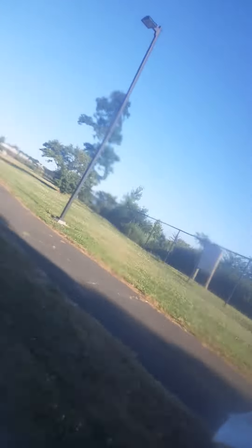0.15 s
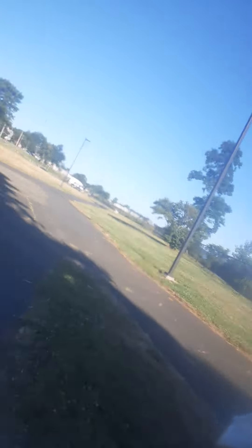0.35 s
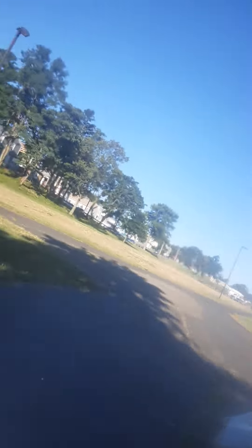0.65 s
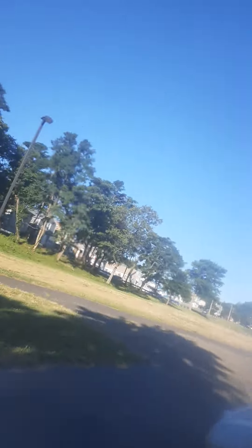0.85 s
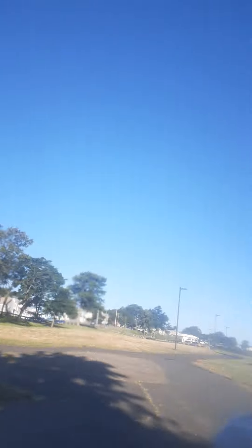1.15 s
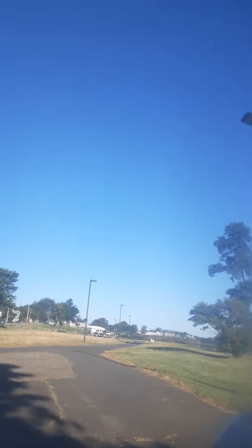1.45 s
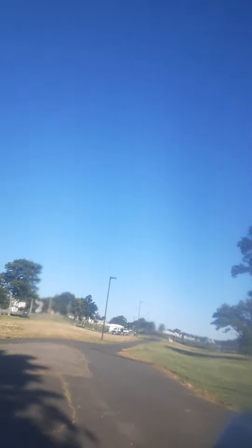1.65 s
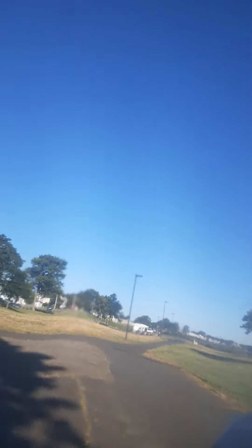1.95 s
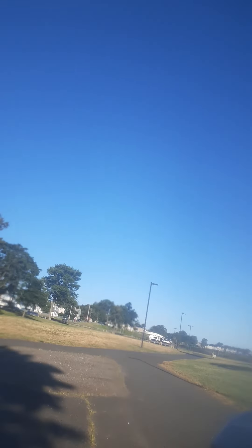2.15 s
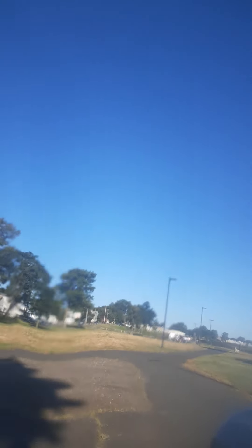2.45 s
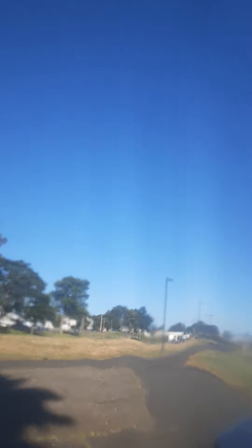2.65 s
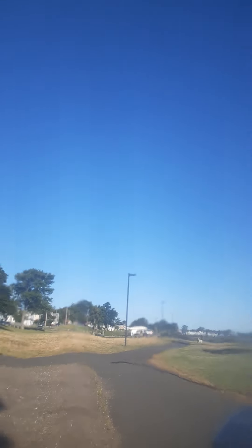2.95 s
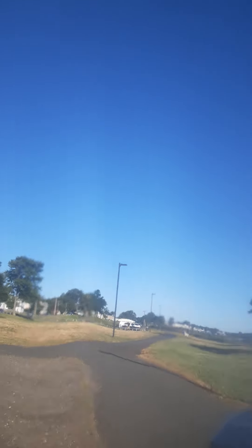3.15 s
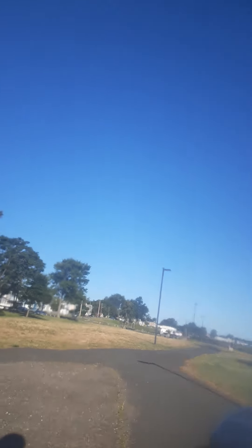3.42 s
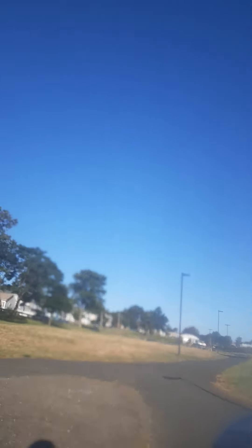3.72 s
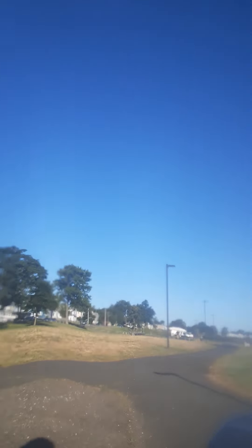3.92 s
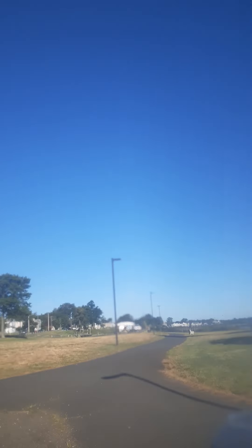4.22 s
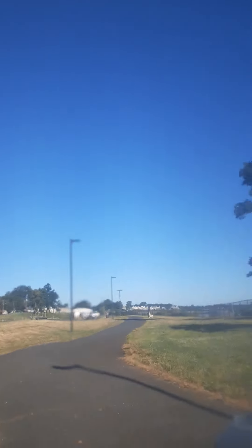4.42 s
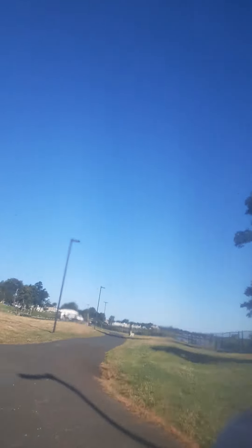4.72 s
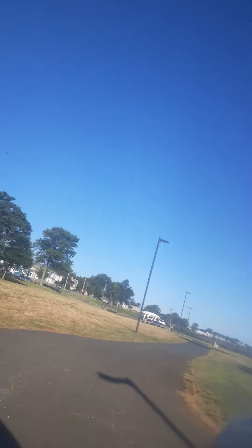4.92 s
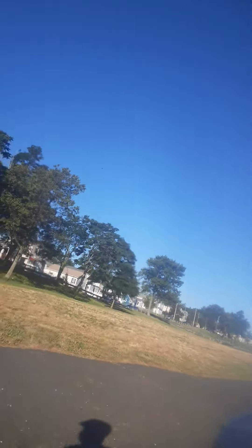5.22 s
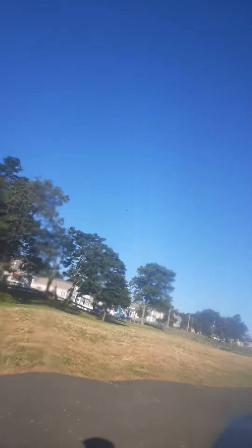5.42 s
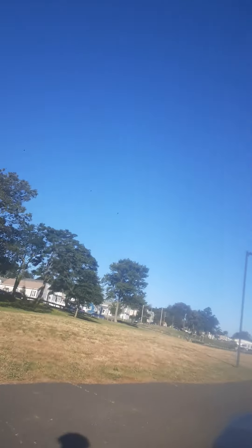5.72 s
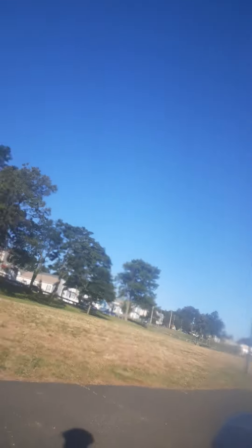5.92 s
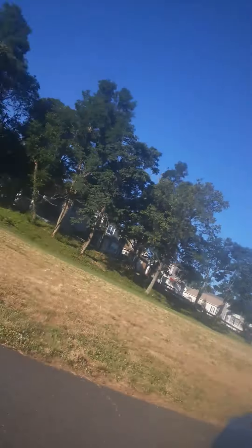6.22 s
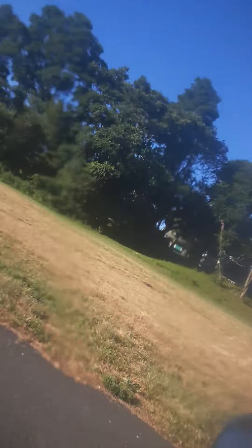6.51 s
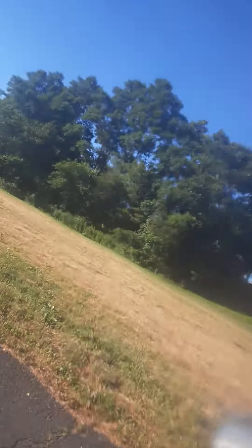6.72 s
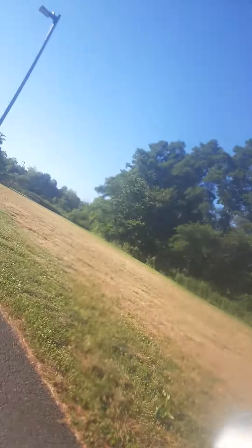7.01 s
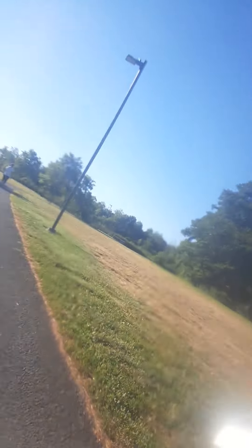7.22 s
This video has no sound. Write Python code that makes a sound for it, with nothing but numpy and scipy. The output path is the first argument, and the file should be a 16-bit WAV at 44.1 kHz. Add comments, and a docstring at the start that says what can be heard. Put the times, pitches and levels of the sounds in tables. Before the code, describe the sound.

A bike-mounted microphone catches close, dry outdoor rolling. Rough thumps and gritty snaps open, then a few woody clacks lead into a quiet smooth stretch where an electric motor hum climbs. A dense run of bumps follows, easing into soft wheel hiss, thin brake squeaks and a short falling whine. A loose fitting clacks, a burst of grit crackles over low tread hum, and the motor returns.

```python
"""Electric bike on a park path

An electric bike rolls along a paved path, heard from a microphone riding on it.
Filtered noise gives the tyre rumble, air and wheel hiss; random clicks crackle as grit and shake the mount.
Bumps and a loose fitting ring hollow, as clicks sent through decaying resonances.
On a smooth stretch wavering sines make the hub motor whine upward, then slow down and pick up again later.
Before the bend short, very high tones squeak as the brake; the tread hums as the bike leans over.
"""
import sys
import numpy as np
from scipy import signal
from scipy.fft import rfft, irfft
from scipy.io import wavfile
from scipy.ndimage import uniform_filter1d, minimum_filter1d

SR = 44100
rng = np.random.default_rng(int(sys.argv[2]) if len(sys.argv) > 2 else 0)


def store_wav(level_fs):
    """Save 16-bit WAV to argv[1]."""
    pcm = np.round(np.clip(np.atleast_2d(level_fs), -1, 1) * 32767)
    wavfile.write(sys.argv[1], SR, pcm.T.astype(np.int16))


N = 324576
TIME = np.arange(N) / SR


def from_db(db):
    """Turn decibels into a gain."""
    return 10 ** (np.asarray(db) / 20)


def rms_one(x):
    """Scale so that the average of the channels has rms 1."""
    middle = np.atleast_2d(x).mean(axis=0)
    return x / np.sqrt(np.mean(middle ** 2) + 1e-20)


def in_time(rows):
    """Draw straight lines between the rows: each column after the time, at every sample."""
    times, *columns = np.transpose(rows)
    return [np.interp(TIME, times, column) for column in columns]


def drift(rate_hz):
    """Smooth random wandering with spread 1; a higher rate (up to 180 Hz) wanders faster."""
    knots_per_s = 400
    knots = rng.standard_normal(int(N / SR * knots_per_s) + 2)
    lowpass = signal.butter(2, min(rate_hz, 180), fs=knots_per_s, output="sos")
    slow = signal.sosfiltfilt(lowpass, knots, padtype="even")
    return rms_one(np.interp(TIME, np.linspace(0, N / SR, len(slow)), slow))


def coloured(x, spectrum):
    """Filter to the given spectrum without sounding early (minimum phase); white noise keeps its energy."""
    size = 4096
    hz, db = np.transpose(spectrum)
    grid_hz = np.maximum(np.arange(size // 2 + 1) * SR / size, 1)
    gain = from_db(np.interp(np.log(grid_hz), np.log(hz), db))
    # folding the cepstrum forward puts the filter's energy as early as possible
    cepstrum = irfft(np.log(gain))
    cepstrum[1:size // 2] *= 2
    cepstrum[size // 2 + 1:] = 0
    response = irfft(np.exp(rfft(cepstrum)))
    response = response / np.linalg.norm(response)
    return signal.fftconvolve(np.atleast_2d(x), [response], axes=1)[:, :N]


def pan(left_db):
    """Gains of the two channels, with mean 1; the left one is left_db above the right."""
    gains = np.array([[from_db(left_db)], [1]])
    return gains / gains.mean()


def stereo(pair, alike, left_db):
    """Mix two unrelated signals into two channels with the given correlation and balance."""
    alike = np.clip(alike, -.95, .95)
    shared = np.sqrt(1 + alike) * pair[0]
    opposed = np.sqrt(1 - alike) * pair[1] * [[1], [-1]]
    return (shared + opposed) * pan(left_db)


def clicks(times, heights):
    """Single impulses at the given times."""
    return np.bincount((np.asarray(times) * SR).astype(int), heights, N)[:N]


def grains(per_s, spread_db):
    """Random impulses of either sign, mostly small, a few large."""
    sizes = from_db(spread_db * np.minimum(rng.exponential(1, N), 4))
    return (rng.random(N) < per_s / SR) * sizes * rng.choice([-1, 1], N)


def fading(x, decay_s):
    """Each impulse becomes a burst that dies away exponentially."""
    return signal.lfilter([1], [1, -np.exp(-1 / (decay_s * SR))], x)


def ring(x, hz, t60):
    """A unit impulse starts a sine of height 1 that falls by 60 dB in t60 seconds."""
    radius = from_db(-60 / (t60 * SR))
    turn = 2 * np.pi * hz / SR   # angle per sample
    return signal.lfilter([0, np.sin(turn)], [1, -2 * radius * np.cos(turn), radius * radius], x + 1e-18)


def struck(times, level_db, modes, vary_db):
    """Each blow rings every mode a little differently; the two sides of the body rock against each other."""
    out = 0
    for hz, db, t60, left_db in modes:
        heights = from_db(level_db + db + vary_db * rng.standard_normal(len(times)))
        signs = rng.choice([-1, -1, 1], len(times))   # the left side mostly moves the opposite way
        left = clicks(times, heights * signs) * from_db(left_db)
        right = clicks(times, heights)
        out = out + ring(np.array([left, right]), hz, t60)
    return out


def softened(x, edge_hz):
    """A padded contact passes little treble."""
    return signal.sosfilt(signal.butter(2, edge_hz, fs=SR, output="sos"), x)


def rolling(rumble_db, shake_db):
    """The tyres rumble, and a quick run of small jolts keeps the mount ringing."""
    # colour of the tyre rumble: (frequency [Hz], relative level [dB])
    rumble_colour = [(20, -52), (42, -34.5), (64, -14.5), (86, 1), (116, 2.5), (155, -11.5), (230, -20),
                     (800, -85)]
    # colour of the shaking mount: (frequency [Hz], relative level [dB])
    shake_colour = [(60, -45.5), (170, -4), (230, -3), (315, 6.5), (370, -0.5), (430, -10.5), (520, -25.5),
                    (800, -32.5), (2500, -77)]
    noise = stereo(rng.standard_normal((2, N)), alike=-.55, left_db=-3.5)
    rumble = rms_one(coloured(noise, rumble_colour))
    jolts = rms_one(np.array([grains(per_s=330, spread_db=3.5) for side in range(2)]))
    shake = rms_one(coloured(stereo(jolts, alike=0.14, left_db=-11.0), shake_colour))
    return from_db(rumble_db) * rumble + from_db(shake_db) * shake


def tyre_load():
    """Swing of the load on the tyres in dB: it drops before each bump and rises or dips on landing."""
    # uneven spots where the bike goes light, then lands:
    # (time of landing [s], half-length [s], landing lift [dB], drop before it [dB])
    bumps = [(0.45, 0.024, -0.5, 3), (0.748, 0.055, -5, 13.5), (1.045, 0.084, 4.5, 9.5),
             (2.581, 0.061, 5, 0.5), (3.808, 0.08, 5, 3), (4.022, 0.073, 5.5, -1.5)]
    light_lead = 1.7   # half-lengths by which the light moment precedes the landing
    load_db = 0
    for s, half_s, lift_db, drop_db in bumps:
        along = (TIME - s) / half_s
        landing = lift_db * np.exp(-along ** 2)
        light = drop_db * np.exp(-(along + light_lead) ** 2)
        load_db = load_db + landing - light
    return load_db


def grit(grit_db):
    """Grains snap under the tread in loose clumps over finer sand; some snaps and the stones sound brighter."""
    # colour of the snapping grit: (frequency [Hz], relative level [dB])
    grit_colour = [(400, 5.5), (1100, 1), (1700, 5.5), (3600, -1), (5000, -6), (6800, -16.5), (9000, -31.5),
                   (12000, -41.5)]
    # colour of the bright grains: (frequency [Hz], relative level [dB])
    bright_colour = [(3000, -8), (7000, -0.5), (9000, -13), (11000, 10.5), (15500, -8.5)]
    clumps = np.clip(drift(45), -2, 1.5)
    thick_db = grit_db + 55   # against the usual depth of grit
    # more grains snap where the grit lies thick
    snaps = grains(225 * from_db(5.5 * clumps + .8 * thick_db), spread_db=3.7)
    # even out the loudness of busy and sparse moments
    snaps = snaps / np.sqrt(np.abs(uniform_filter1d(snaps ** 2, size=2500)) + 0.049)
    sand_db = 4.5 * clumps + .4 * thick_db - 19.5
    sand = rms_one(grains(per_s=2200, spread_db=2.5)) * from_db(sand_db)
    stones = flicked_stones()
    bed = from_db(grit_db + 9.5) * (snaps + sand) + stones
    # about one snap in eight, and the flicked stones, also reach the top treble
    bright_snaps = snaps * (rng.random(N) < .12)
    bright = from_db(grit_db + 3.5) * bright_snaps + from_db(-20.0) * stones
    # each snap scatters a little dust
    dust = 0.22 * fading(np.abs(bed), decay_s=.0007) * rng.standard_normal((2, N))
    return from_road(coloured(bed + dust, grit_colour) + coloured(bright, bright_colour))


def flicked_stones():
    """Each large stone flicked by a tyre snaps once and sets off a short, dying scatter of smaller grains."""
    # the largest stones: (time [s], strength of the snap before colouring [dB])
    stone_rows = [(0.012, -19.5), (.024, -16), (0.1068, -12), (0.508, -13.5), (0.751, -13.5),
                  (1.0048, -15.5), (2.551, -14), (2.858, -21), (2.879, -15), (3.0537, -16), (3.1309, -16),
                  (4.501, -17.5), (4.672, -22), (4.8, -19), (4.831, -20.5), (4.921, -20), (4.941, -22),
                  (5.122, -22.5), (5.2327, -15.5), (5.353, -19.5), (5.509, -22), (5.613, -21.5),
                  (5.6333, -23.5), (5.703, -24), (5.7466, -19.5), (5.792, -22), (5.949, -24), (6.084, -25),
                  (6.1986, -20), (6.268, -16.5), (6.359, -17), (6.382, -20), (6.414, -22), (6.447, -35),
                  (6.499, -17), (6.55, -19.5), (6.663, -23.5), (6.7265, -24), (6.7662, -17.5),
                  (6.8367, -16), (7.0267, -20), (7.11, -29), (7.139, -12.5), (7.2327, -19), (7.2745, -18)]
    times, strength_db = np.transpose(stone_rows)
    snaps = clicks(times, from_db(strength_db))
    dying = fading(snaps + 1e-18, decay_s=.004)
    return snaps + from_db(-11) * dying * grains(per_s=800, spread_db=4.0)


def from_road(x):
    """Grit sounds reach the right port of the microphone a moment later, and with a colour of its own."""
    # colour of the grit at the far, right port: (frequency [Hz], relative level [dB])
    far_port = [(5000, 3.5), (7000, 10), (10500, -14.5), (14500, 11.5)]
    lag = 13   # samples
    right = coloured(x[1], far_port)[0]
    return np.array([x[0], np.pad(right, (lag, 0))[:N]])


def knocks(grit_db, shake_db):
    """An edge rings the mount and crunches the tread; the harder the crunch, the stronger the frame thuds."""
    # hard edges that knock the mount: (time [s], strength of ring [dB], strength of crunch [dB])
    hard_edges = [(0.087, 6, -28), (0.262, 0, -34), (0.392, 5, -29.5), (0.427, 0, -25), (0.445, 9, -24.5),
                  (0.477, 3, -15), (0.55, 4, -29), (0.587, 11, -21), (0.715, 2.5, -22.5), (0.747, 1, -29),
                  (1.027, 2, -19), (1.078, 20, -37), (2.419, 7, -33), (2.506, -9, -23), (2.573, 0, -26),
                  (2.61, 7.5, -27.5), (2.679, 8, -15.5), (2.746, 9, -22.5), (2.853, 7, -23),
                  (2.934, -2.5, -33), (3.001, 0.5, -33.5), (3.077, 11.5, -23.5), (3.158, -4, -35.5),
                  (3.227, 4, -25.5), (3.287, -2.5, -32), (3.344, 7, -29), (3.411, 0.5, -31),
                  (3.479, 0, -29.5), (3.761, -3, -27.5), (3.791, 9, -13.5), (3.824, 13, -18.5),
                  (3.855, -1, -21), (3.882, 3, -38), (3.976, 12, -31), (3.995, 7.5, -19.5),
                  (4.4, -2, -34.5), (4.555, 0, -30), (4.607, 0, -28.5)]
    # modes of the mount: (frequency [Hz], level [dB], 60 dB decay time [s], left minus right [dB])
    mount = [(255, -7, .028, -9), (315, -2, .034, -11), (365, -5, .032, -12), (640, -20, .018, -6)]
    # modes of the frame on its tyres: (frequency [Hz], level [dB], 60 dB decay time [s], left minus right [dB])
    frame = [(85, -10.5, 0.03, 4), (140, 6, 0.035, -19), (159.5, 9.5, 0.089, -8)]
    # colour of the crunch: (frequency [Hz], relative level [dB])
    crunch_colour = [(150, -7), (560, 9.5), (900, -3.5), (1500, -11), (2300, -17.5), (6800, -30.5),
                     (9000, -42.5)]
    edges = np.vstack([hard_edges, small_edges(grit_db, shake_db, count=130)])
    times, ring_db, crunch_db = edges.T
    rings = softened(struck(times, ring_db, mount, vary_db=5.0), edge_hz=247)
    thuds = softened(struck(times, crunch_db + 10, frame, vary_db=2.0), edge_hz=122)
    body = signal.sosfilt(signal.butter(3, 75, "high", fs=SR, output="sos"), rings + thuds)
    burst = fading(clicks(times, from_db(crunch_db)), decay_s=0.009)
    contacts = rms_one(np.array([grains(per_s=1100, spread_db=0.6) for side in range(2)]))
    crunch = stereo(0.5 * burst * contacts, alike=0.012, left_db=-5.5)
    return body + coloured(crunch, crunch_colour)


def small_edges(grit_db, shake_db, count):
    """Faint knocks on small edges in the paving at random times, harder where it is both rough and gritty."""
    when, size = rng.random((count, 2)).T
    at = (when * (N - 1)).astype(int)
    # a crunch lies 15.5 dB above the grit where the mount shakes at -27.5 dB
    rough_db = shake_db[at] + 27.5
    vary_db = 1.5 * (2 * size - 1)
    crunch_db = grit_db[at] + 15.5 + rough_db + vary_db
    ring_db = crunch_db + 20.5
    return np.transpose([at / SR, ring_db, crunch_db])


def clunks():
    """A loose fitting clacks on its stop and rings a hollow note with a short woody overtone; hard clacks glint."""
    # blows of the fitting: (time [s], strength of note [dB], pitch [Hz], 60 dB decay time [s],
    # overtone relative to the note [dB], strength of clack [dB])
    blows = [(1.2457, -3, 310, 0.012, -6, -42.5), (1.311, -3, 320, 0.02, -5.5, -44),
             (1.376, -2.5, 335, 0.03, -7.5, -41), (5.9867, 2, 343, 0.04, -8.5, -34.5),
             (6.0998, -1.5, 357, 0.057, -5, -45), (6.1216, -3, 356.5, 0.089, -20, -42),
             (6.875, -8.5, 345, 0.098, -19, -62)]
    # modes of the clack: (middle frequency [Hz], middle level [dB], 60 dB decay time [s])
    clack_modes = [(1570, 2, 0.017), (1930, 2, 0.0095), (2500, -0.5, 0.012), (6800, -8, .012)]
    glint_db = -29.5     # metallic top of the hardest clack, before filtering
    glint_growth = 2.5   # dB lost per dB by which a clack is softer
    notes, clacks, glints = 0, 0, 0
    hardest_db = max(row[-1] for row in blows)
    hollow = signal.butter(2, [220, 540], "band", fs=SR, output="sos")
    for s, db, hz, t60, overtone_db, clack_db in blows:
        blow = clicks([s], [1.0])
        overtone = from_db(overtone_db) * ring(blow, hz=676, t60=0.026)
        note = signal.sosfilt(hollow, ring(blow, hz, t60)) + softened(overtone, edge_hz=370)
        notes = notes + from_db(db) * note
        for k, (mode_hz, mode_db, mode_t60) in enumerate(clack_modes):
            # each blow lands on a different spot
            detune, vary_db = rng.uniform(-1, 1, 2) * [.08, 2.5]
            height = (-1) ** k * from_db(clack_db + mode_db + vary_db)
            clacks = clacks + height * ring(blow, mode_hz * (1 + detune), mode_t60)
        contact = (TIME >= s) * np.exp(-np.abs(TIME - s) / 0.0019)
        glints = glints + from_db(glint_db + glint_growth * (clack_db - hardest_db)) * contact
    notes = notes * [[.2], [1.2]]   # mostly on the right
    treble = signal.butter(2, [5000, 15000], "band", fs=SR, output="sos")
    glints = signal.sosfilt(treble, glints * rng.standard_normal((2, N)))
    return notes + (clacks + glints) * pan(-3.5)


def motor():
    """Under power the gears sing, and wavering partials swell on resonances; at light load one line is left."""
    # motor speeding up: (time [s], gear pitch [Hz], level [dB])
    speeding_up = [(1.38, 306, -24), (1.47, 307.4, -20), (1.64, 314, -16.5), (1.8, 338.5, -14),
                   (1.94, 366.2, -20.5), (2.19, 421.2, -28), (2.29, 425.6, -45), (2.38, 435.3, -30),
                   (2.48, 460.6, -45)]
    # motor slowing down: (time [s], gear pitch [Hz], level [dB])
    slowing_down = [(5.12, 440, -44), (5.2, 387.2, -33.5), (5.28, 339, -22), (5.37, 289, -40),
                    (5.6, 172.6, -35), (5.68, 150.2, -37)]
    # motor picking up again out of the bend: (time [s], gear pitch [Hz], level [dB])
    picking_up = [(7.08, 286, -29), (7.42, 296.8, -23)]
    # weaker partials: (multiple of the gear pitch, level away from resonances [dB])
    orders = [(.442, -31), (.885, -39), (2, -58), (3, -71.5)]
    # resonances of frame, mount and motor housing: (frequency [Hz], half-width [Hz], lift [dB])
    resonances = [(130.5, 3, 9), (198, 7.2, 4), (349.6, 23, 16), (865, 72, 6.5)]
    out, phase, on = gear_tone(speeding_up, waver_db=0.55)
    pitch = in_time(speeding_up)[0]
    for multiple, db in orders:
        swell_db = 0
        for hz, width_hz, lift_db in resonances:
            swell_db = swell_db + lift_db / (1 + ((multiple * pitch - hz) / width_hz) ** 2)
        partial = np.sqrt(2) * np.sin(multiple * (phase + .42 * drift(55)))
        waver_db = 5 * np.tanh(drift(22))   # swings by at most 5 dB
        out = out + on * from_db(db + swell_db + waver_db) * partial * pan(-19.5)
    slowing = gear_tone(slowing_down, waver_db=1.2)[0]
    again = gear_tone(picking_up, waver_db=5.0)[0]
    return out + slowing + again


def gear_tone(run, waver_db):
    """The main line of the motor gears, less steady at speed; returns it with its phase and its fade."""
    pitch, level_db = in_time(run)
    on = np.clip(np.minimum(TIME - run[0][0], run[-1][0] - TIME) / 0.037, 0, 1)
    unsteady = np.maximum(pitch / 300, 1) ** 4   # grows above 300 Hz
    phase = 2 * np.pi * np.cumsum(pitch * (1 + .002 * unsteady * drift(30))) / SR
    loudness = np.sqrt(2) * on * from_db(level_db + waver_db * unsteady * drift(31))
    ports = np.array([.56 * np.sin(phase + 1.3), 1.75 * np.sin(phase)])
    return loudness * ports, phase, on


def brake():
    """The pad grazes the disc in short, fluttering squeaks."""
    # squeaks: (time of the middle [s], length [s], pitch [Hz], level [dB]);
    # the fades stretch 0.68 lengths to either side of the middle
    squeaks = [(4.343, .031, 14000, -46), (4.425, .02, 14000, -47), (4.496, 0.037, 14100, -35.5),
               (4.837, .025, 14130, -49), (4.952, 0.021, 14220, -48), (5.029, 0.039, 14060, -27.5),
               (5.076, 0.041, 13800, -26), (5.088, 0.065, 13980, -34), (5.156, 0.04, 13800, -32),
               (5.22, 0.028, 13820, -50), (5.74, 0.042, 11800, -53)]
    waver_hz = 40 * drift(180)
    flutter = from_db(2.5 * drift(150))
    out = 0
    for s, length, hz, db in squeaks:
        touch = np.cos(np.pi / 2 * np.clip((TIME - s) / (length * 0.68), -1, 1)) ** 2
        tone = np.exp(2j * np.pi * np.cumsum(hz + waver_hz) / SR)
        out = out + from_db(db) * touch * flutter * tone
    return np.array([out.real, out.imag]) * pan(-7.0)   # the ports lie a quarter wave apart


def tread_hum():
    """Leaning over, the tyre's side blocks drum an unsteady low note; the ports swing out of step."""
    # hum of the tread blocks in the bend: (time [s], middle pitch [Hz], middle level [dB])
    tread = [(6.12, 115.8, -53), (6.27, 115.2, -15.5), (6.43, 117.8, -19), (6.55, 116.6, -32.5),
             (7.202, 110.4, -24.5), (7.3, 109.5, -37)]
    pitch, level_db = in_time(tread)
    on = np.clip(np.minimum(TIME - tread[0][0], tread[-1][0] - TIME) / .03, 0, 1)
    phase = 2 * np.pi * np.cumsum(pitch * (1 + .035 * drift(14))) / SR
    loudness = np.sqrt(2) * on * from_db(level_db + 0.61 * drift(5.2))
    return loudness * np.array([np.sin(phase + 1.64), np.sin(phase)]) * pan(-7.0)


def background():
    """Open air, and the smooth hiss of wheels running free, both as filtered noise."""
    # colour of the air: (frequency [Hz], relative level [dB])
    air_colour = [(500, 6.5), (850, 6), (1200, -10), (1900, -7.5), (3000, -49.5), (9500, -49), (15000, -19),
                  (16000, -41.5)]
    # colour of the wheel hiss: (frequency [Hz], relative level [dB])
    wheel_colour = [(900, -3), (1700, 1), (2900, -9.5), (5000, -10.5), (6900, -6), (9000, -32.5),
                    (14400, -7), (16000, -19)]
    # hiss of the freely rolling wheels: (time [s], level [dB])
    coasting = [(1.0, -72.5), (1.3, -77.5), (2.6, -73.5), (4.5, -63.5), (5.9, -65.5), (7.36, -71.5)]
    air = rms_one(coloured(stereo(rng.standard_normal((2, N)), alike=.1, left_db=-2.0), air_colour))
    wheels = rms_one(coloured(stereo(rng.standard_normal((2, N)), alike=0.05, left_db=-13.0), wheel_colour))
    return from_db(-53.5) * air + from_db(in_time(coasting)[0]) * wheels


def scene():
    """Everything that travels with the bike; the load on the tyres drives rumble, shaking and grit together."""
    # the path under the tyres, before the load swings: (time [s], tyre rumble [dB], shaking of the mount [dB])
    path = [(0, -22, -28), (.55, -25.5, -17.5), (.85, -17.5, -16), (1.25, -31.5, -23.5), (1.85, -34, -33.5),
            (2.35, -26, -23), (2.7, -21.5, -21), (4.25, -26, -22.5), (5.15, -30, -29.5), (5.8, -29.5, -29),
            (6.45, -21, -25.5), (6.8, -25.5, -28), (7.36, -19.5, -25.5)]
    # loose grit on the path, before the load swings: (time [s], level [dB])
    loose_grit = [(0, -52), (.9, -61), (1.08, -56), (1.2, -68), (1.9, -82.5), (2.44, -69), (2.55, -54),
                  (3.3, -57), (4.0, -53), (4.7, -59), (5.35, -62.5), (6.1, -65.5), (6.27, -51.5),
                  (6.39, -48), (6.52, -54.5), (6.64, -63), (6.75, -55.5), (7.36, -58.5)]
    rumble_db, shake_db = in_time(path)
    grit_db, = in_time(loose_grit)
    load_db = tyre_load()
    road = rolling(rumble_db + load_db, shake_db + load_db)
    road = road + grit(grit_db + 0.21 * load_db)   # grit follows the load only a little
    return road + tread_hum() + knocks(grit_db, shake_db) + clunks() + motor() + brake() + background()


def record(dry):
    """A fast limiter keeps each channel within full scale; the ends are faded and the top treble is cut."""
    headroom = np.minimum(1, 1 / (np.abs(dry) + 1e-9))
    gain = uniform_filter1d(minimum_filter1d(headroom, size=200, axis=1), size=200, axis=1)
    ends = np.minimum(1, np.minimum(TIME, TIME[-1] - TIME) / .004)
    top_cut = signal.ellip(10, .1, 80, 16100, fs=SR, output="sos")   # steep cut at 16.1 kHz
    return signal.sosfilt(top_cut, dry * gain * ends)


dry = scene()
out = record(dry)
store_wav(out)
```